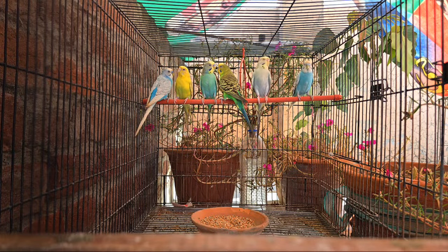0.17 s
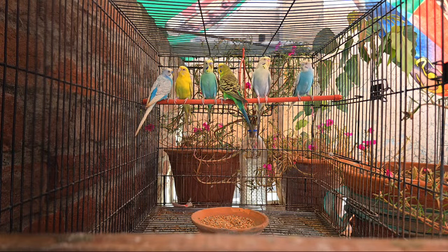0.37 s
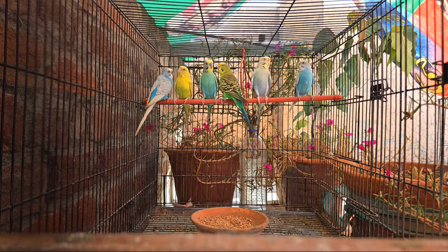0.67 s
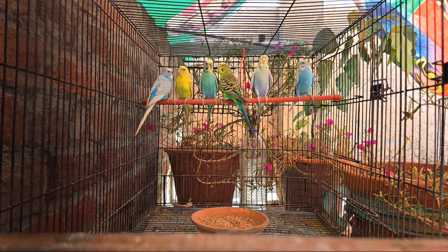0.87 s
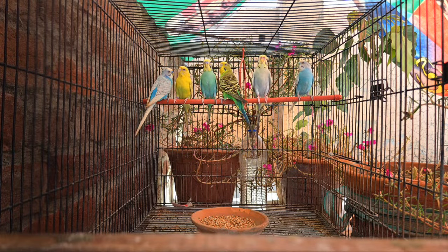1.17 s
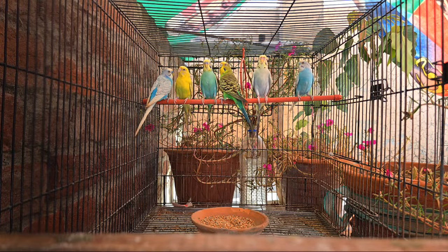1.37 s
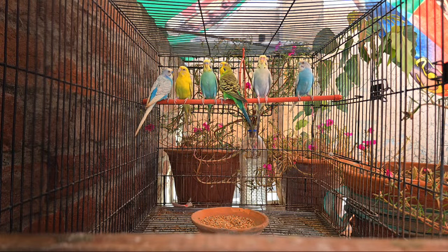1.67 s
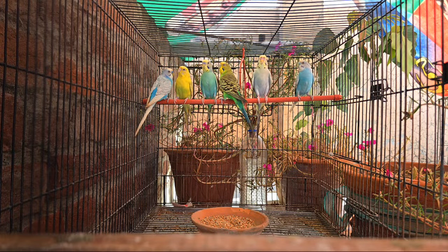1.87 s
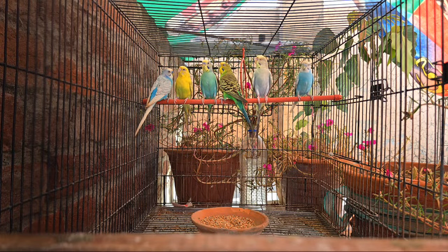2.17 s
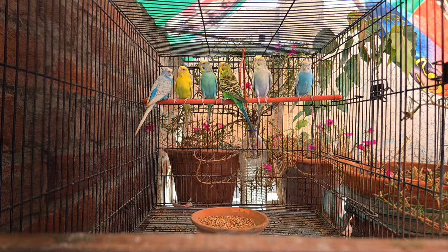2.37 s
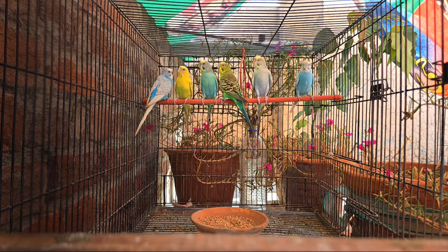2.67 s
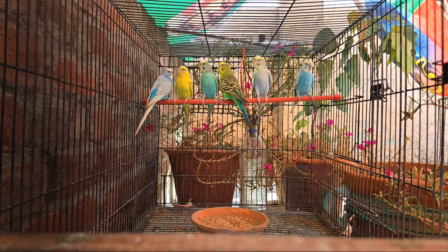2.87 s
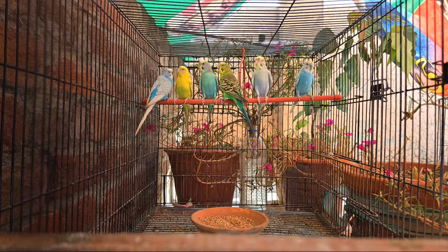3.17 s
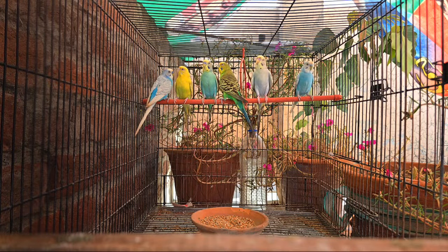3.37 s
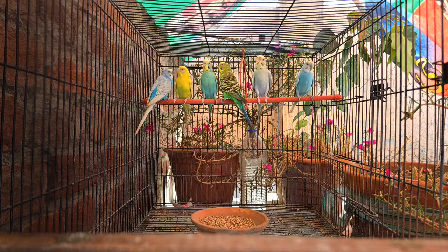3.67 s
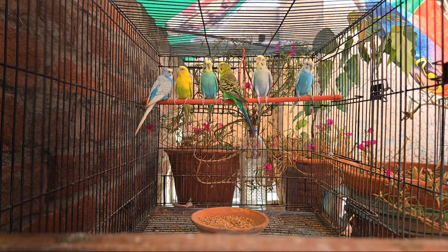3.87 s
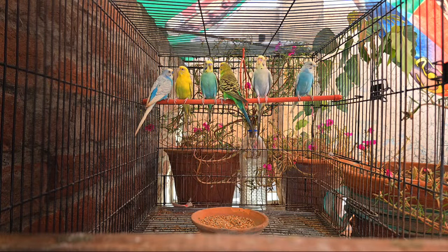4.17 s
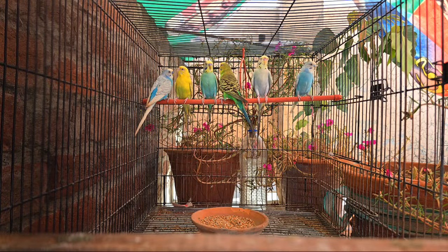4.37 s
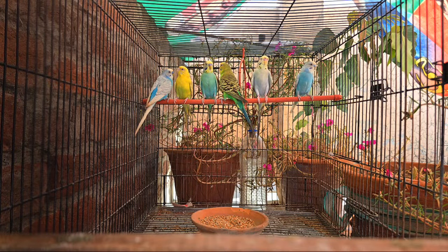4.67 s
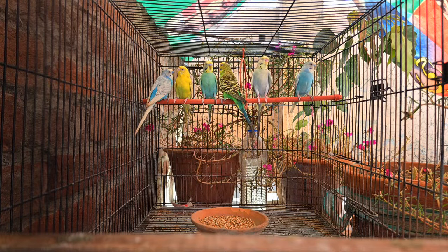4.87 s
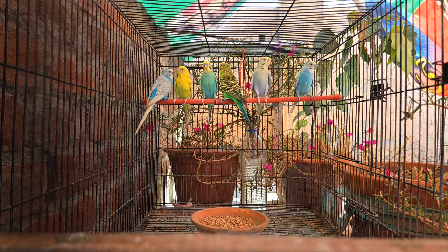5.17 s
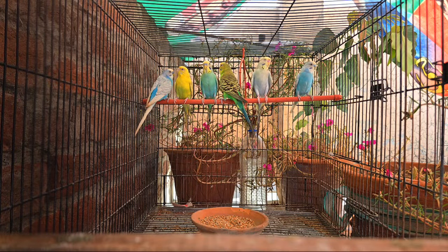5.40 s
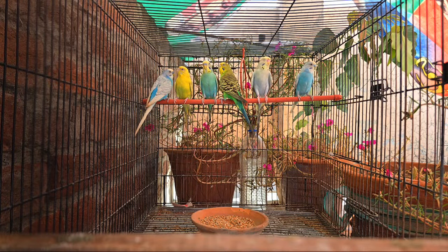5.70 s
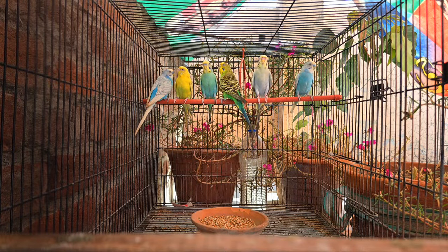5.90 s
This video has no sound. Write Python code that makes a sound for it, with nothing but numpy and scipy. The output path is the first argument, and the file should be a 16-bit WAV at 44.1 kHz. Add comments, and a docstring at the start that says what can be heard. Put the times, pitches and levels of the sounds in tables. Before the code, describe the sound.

Budgerigars in a cage give three pairs of sharp, raspy high chirps over a low traffic hum, with faint distant bird calls between.

```python
"""Budgerigars on a perch in a cage call three times in pairs: a loud high chirp, then a softer one that dips and climbs.
Each chirp is a tone with overtones, breath-like noise and a high hiss: fast flutter makes it a rasp, whistles come clear.
A brick wall and the porch around it answer with echoes, and the nook around the cage resonates.
Other birds call faintly far away, as filtered noise and wavering partials, over traffic hum of shaped noise."""
import sys
import numpy as np
from scipy import signal
from scipy.fft import rfft, irfft, next_fast_len
from scipy.io import wavfile
from scipy.ndimage import uniform_filter1d, minimum_filter1d, map_coordinates

SR = 44100
rng = np.random.default_rng(int(sys.argv[2]) if len(sys.argv) > 2 else 0)


def materialize(psi):
    """Save the field psi as 16-bit PCM at rate SR to the path in sys.argv[1].

    A 1-D psi becomes a single channel; in a 2-D psi each row is a channel.
    """
    bounded = np.clip(np.atleast_2d(psi).T, -1, 1)
    quanta = np.round(bounded * 32767).astype(np.int16)
    wavfile.write(sys.argv[1], SR, quanta)


N = 266275

# a gliding chirp lets go at the first time, before its stretch; every chirp has died the second time after letting go
GLIDE_RELEASE_S, RELEASE_S = 0.11917, 0.057


def amp(db):
    """Level to gain: 20 dB is a factor of ten in amplitude."""
    return 10 ** (np.asarray(db) / 20)


def unit(x):
    """Normalise the effective value: scale to rms 1."""
    return x / np.sqrt(np.mean(x ** 2) + 1e-20)


def along(points, hz):
    """Interpolate (frequency, value) points on a logarithmic frequency axis."""
    f, v = np.transpose(points)
    return np.interp(np.log(hz + 1), np.log(f + 1), v)


def level_curve(points, t):
    """Interpolate (time, level) points linearly at the times t."""
    s, db = np.transpose(points)
    return np.interp(t, s, db)


def wobble(rate, t):
    """Slow random modulation: interpolated normal noise with rate knots a second."""
    knots = rng.standard_normal(int(t[-1] * rate) + 4)
    return map_coordinates(knots, [t * rate])


def filtered(x, response):
    """Linear filtering: multiply the spectrum by a response of frequency."""
    m = next_fast_len(len(x) + 8192)
    return irfft(rfft(x, m) * response(np.fft.rfftfreq(m, 1 / SR)), m)[:len(x)]


def noise(spectrum, size):
    """Coloured noise: white noise shaped by (frequency, relative level) points, at rms 1."""
    return unit(filtered(rng.standard_normal(size), lambda hz: amp(along(spectrum, hz))))


def running_phase(hz):
    """Phase is the time integral of frequency, in radians."""
    return 2 * np.pi * np.cumsum(hz) / SR


def step(t, width):
    """Smooth transition: a hyperbolic tangent from 0 to 1 about t = 0."""
    return .5 + .5 * np.tanh(t / width)


def bump(t, width):
    """Gaussian pulse of height 1 at t = 0."""
    return np.exp(-(t / width) ** 2)


def background(hum_db=-1, rumble_db=-0.04, road_db=1.0, air_db=-84.5):
    """Sum of independent band noises: distant engines hum and rumble under road noise and a faint even hiss."""
    # colours, levelled to rms 1 as noise: frequency_hz, relative_db
    hum_colour = [(60, -49), (105, -25.5), (119, -4.5), (127, 4), (136, -0.5), (150, -8), (175, -33),
                  (300, -71.5), (600, -100)]
    rumble_colour = [(20, -43.5), (40, -22.5), (60, -8), (76, 7), (92, 2), (110, -12), (200, -56),
                     (600, -100)]
    road_colour = [(100, -24.5), (175, 4.5), (235, -2.5), (275, -3), (298, 5.5), (325, -6), (480, -9.5),
                   (700, -20), (1300, -28.5), (3000, -39.5), (7000, -59.5)]
    air_colour = [(200, 6.5), (1500, 6), (4000, 2.5), (7000, 0), (9500, -4), (11000, 3), (16000, -2.5)]
    # levels of engine hum, low engine rumble and road noise, before the trims above: time_s, level_db
    hum_level = [(0.05, -36.5), (0.45, -40), (0.7, -49), (0.9, -41.5), (1.25, -41), (1.55, -50),
                 (2.05, -40), (2.45, -45), (2.8, -41.0), (3.25, -50), (3.9, -57.5), (4.5, -49.5),
                 (5.05, -43.5), (5.5, -45), (5.7, -55.5), (5.95, -57)]
    rumble_level = [(0.15, -45.5), (0.5, -59.5), (0.85, -55.5), (1.1, -63), (2.0, -60), (2.5, -50.5),
                    (2.7, -44.5), (2.95, -47), (3.7, -56), (5.2, -56.5), (5.9, -63)]
    road_level = [(0.031, -55.5), (0.27, -55), (0.42, -61), (1.5, -59.5), (2.9, -57.5), (3.25, -64),
                  (4.301, -66.5), (5.1, -61.5), (5.65, -65)]
    waver_db, waver_knots_per_s = 1.3845, 7
    t = np.arange(N) / SR
    # an engine holds its level while its pitch wanders, so divide out most of the envelope
    analytic = signal.hilbert(noise(hum_colour, size=N))
    drone = unit(analytic.real / (np.abs(analytic) + 1.8))
    drone = unit(drone * amp(waver_db * wobble(waver_knots_per_s, t)))
    hum = amp(level_curve(hum_level, t) + hum_db) * drone
    rumble = amp(level_curve(rumble_level, t) + rumble_db) * noise(rumble_colour, size=N)
    road = amp(level_curve(road_level, t) + road_db) * noise(road_colour, size=N)
    return hum + rumble + road + amp(air_db) * noise(air_colour, size=N)


def far_birds():
    """Diffuse sound: distant calls arrive as echo only, narrow noise that swells around a pitch."""
    # far calls; two widths off the pitch the gain is a quarter, and
    # the level is that of the noise before its swell: middle_s, length_s, pitch_hz, width_hz, level_db
    calls = [(0.044, 0.1, 2535, 54.6, -62.5), (0.153, 0.12, 5070, 301.5, -82),
             (0.74, 0.16, 1914, 203.8, -73), (1.513, 0.098, 3446, 247.5, -83),
             (2.001, 0.265, 2582, 810, -66), (2.443, 0.15, 970, 281, -67),
             (2.645, 0.13, 3720, 220.3, -79.5), (3.011, 0.13, 1699, 132.8, -66.5),
             (3.616, 0.13, 1661, 138.6, -76.5), (3.758, 0.14, 380, 44.47, -64.5),
             (4.268, 0.1683, 3534, 335.2, -71), (4.254, 0.28, 1629, 400, -77.5),
             (4.901, 0.18, 3510, 301.9, -72), (4.851, 0.397, 1287, 605, -77),
             (5.32, .12, 4440, 202.3, -82.5), (5.398, 0.14, 1946, 150, -69.5)]
    t = np.arange(SR) / SR - .5
    out = np.zeros(N + 2 * SR)
    for middle, length, pitch_hz, width_hz, db in calls:
        band = lambda hz: 1 / (1 + ((hz - pitch_hz) / width_hz / 2) ** 2) ** 2
        blur = unit(filtered(rng.standard_normal(SR), band))
        out[round(middle * SR):][:SR] += amp(db) * blur * np.exp(-2 * (t / length) ** 2)
    return out[SR // 2:][:N]


def far_squawk(middle_s=1.996, length_s=0.2184, trim_db=5, waver_hz=22):
    """Additive synthesis: a larger bird far away, as a few wavering partials that swell and fade."""
    # partials, level before the trim and the waver: frequency_hz, level_db
    partials = [(1723, -88.5), (1825, -80), (2449, -99), (2568, -75.5), (3009, -76), (3440, -81),
                (3865, -81.5), (5211, -92)]
    t = np.arange(N) / SR
    squawk = 0
    for hz, db in partials:
        level = amp(db + 4 * wobble(29.97, t))
        squawk = squawk + level * np.sin(running_phase(hz + waver_hz * wobble(47, t)))
    return amp(trim_db) * squawk * np.exp(-2 * ((t - middle_s) / length_s) ** 2)


def porch(x, tail_db=-22.0, scatter_db=-14, scatter_t60_s=.13):
    """Reverberation by convolution: early wall echoes, quick scatter around the cage and a weak longer tail."""
    # first echoes of the walls: delay_s, level_db
    walls = [(.00134, -15), (.0022, -19), (.0065, -14.5), (0.0107, -11.5), (.0229, -14.5)]
    # decay of the tail by 60 dB: frequency_hz, t60_s
    decay = [(300, .45), (2200, 0.2), (3000, 0.32), (3700, 0.12), (6000, 0.35), (10000, .28),
             (15000, 0.065)]
    # colour of the tail as it begins: frequency_hz, relative_db
    colour = [(1500, -3.5), (2400, -7), (3050, 6), (3650, 8), (5000, -1.5), (15000, -3)]
    hz, t, z = signal.stft(rng.standard_normal(SR * 3 // 4), SR, nperseg=256)
    fading = amp(along(colour, hz)[:, None] - 60 * t / along(decay, hz)[:, None])
    tail = signal.istft(z * fading, SR, nperseg=256)[1]
    t = np.arange(len(tail)) / SR
    scatter = rng.standard_normal(len(t)) * amp(-60 * t / scatter_t60_s) * (t > .003)
    answer = amp(tail_db) * tail / np.linalg.norm(tail)
    answer = answer + amp(scatter_db) * scatter / np.linalg.norm(scatter)
    for delay, db in walls:
        answer[round(delay * SR)] += amp(db)
    return signal.fftconvolve(x, answer)[:N]


def nook(x, direct_db=-3):
    """Cavity resonance: the space between wall, floor and roof rings briefly at a few pitches."""
    # modes of the nook: centre_hz, width_hz, level_db
    modes = [(2015, 17, -10.5), (2175, 15, -6.5), (2731, 41, -5.5), (2953, 40, -3), (3198, 19, -4.5),
             (3591.3, 28, -7.5), (4500, 65, -7.5)]

    def response(f):
        """Direct sound plus second-order band-pass resonances."""
        ring = sum(amp(db) * 1j * f * w / (c * c - f * f + 1j * f * w) for c, w, db in modes)
        return amp(direct_db) + ring

    return filtered(x, response)


def effort(t, release):
    """Envelope in dB: exponential approach from below, hold, then a steep linear fall."""
    attack_db, attack_s, release_db_per_s = 31, 0.0047, 951
    return -attack_db * np.exp(-t / attack_s) - release_db_per_s * np.maximum(t - release, 0)


def leaping(t, low_hz, high_hz, jump, drop, again, release, rasp_db, rasp_rough):
    """Register switching: pitch, effort and roughness jump between a rough low and a clear high register."""
    switch_s, sag_hz_per_s = 0.002, 2100  # the whistle sinks from the first jump on
    rasp = 1 - step(t - jump, switch_s)
    dropped = step(t - drop, switch_s) * (1 - step(t - again, switch_s))
    whistle = 1 - rasp - dropped
    # the rasp briefly settles into a tone, then sags and weakens just before the jump
    settle = bump(t - jump + .022, .007)
    strain = bump(t - jump + .009, .005)
    # the long whistle falters part way through
    falter = bump(t - jump - 0.6 * (drop - jump), 0.009)
    # the first and the last jump land with an accent, the last after a slackening
    first_kick, last_kick = (bump(t - s - 0.0024, 0.0061) for s in (jump, again))
    pause = bump(t - again + .006, 0.0071)
    # the pitch flicks up as the voice starts
    flick = bump(t - .013, 0.0094)
    hz = (low_hz + whistle * (high_hz - low_hz - sag_hz_per_s * (t - jump))
          + 480 * flick - 330 * strain)
    effort_db = (effort(t, release) + rasp * rasp_db - 1 * dropped + 6.5 * settle
                 - 0.5 * strain - 9 * falter - 5 * pause + 3.5 * first_kick + 8.5 * last_kick)
    rough = (rasp * rasp_rough * (1 - .6 * settle) + strain + 0.37 * dropped
             + 0.045 * whistle + .3 * falter)
    return hz, effort_db, rough


def gliding(t):
    """Frequency glide: pitch, effort and roughness of a chirp that falls as a rasp and clears as it climbs."""
    # pitch before the chirp's own pitch factor; t is the time before its stretch
    top_hz, dip_hz, climb_hz_per_s, climb_s = 3726.5, 2413.3, 9500, 0.046
    throb_hz, throb_peak_s, throb_swing_hz, throb_db = 54.5, .1, 110, 6.5
    glide_db, clear_db, glide_rough, clear_rough = -8, 11, 0.6024, .05
    fallen = step(t - .022, .011)
    # louder and a little clearer in the dip, slack at the turn, then a loud whistle
    dip = bump(t - .036, 0.0054)
    turn = bump(t - .056, 0.0046)
    clear = bump(t - 0.08914, .02)
    soft_start = bump(t, 0.01191)
    # the voice throbs in pitch once it has fallen, and in level as it clears
    throb = np.cos(2 * np.pi * throb_hz * (t - throb_peak_s))
    hz = (top_hz + fallen * (dip_hz - top_hz + throb_swing_hz * throb)
          + climb_hz_per_s * (np.clip(t, climb_s, GLIDE_RELEASE_S) - climb_s))
    effort_db = (effort(t, GLIDE_RELEASE_S) + glide_db + 6.5 * dip
                 + clear * (clear_db + throb_db * throb) - 7.5 * turn - 5.5 * soft_start)
    rough = glide_rough + (clear_rough - glide_rough) * clear - 0.13 * dip
    return hz, effort_db, rough


def side_tones(t, waver=.035, fits_db=9):
    """Frequency and amplitude modulation: unsteady tones come and go in fits beside the main pitch."""
    # tones of a harshly buzzing voice, before buzz, roughness and effort weight them: frequency_hz, level_db
    tones = [(1950, -8.5), (4500, -12.5)]
    out = 0
    for hz, db in tones:
        level = amp(db + fits_db * np.tanh(wobble(110, t)))
        out = out + level * np.sin(running_phase(hz * (1 + waver * wobble(400, t))))
    return out


def chirp(t, hz, effort_db, rough, length, overtone_db, buzz, breath_db, high_hiss_db,
          flutter_hz=330, swing_hz=460, buzz_hz=1300, shake_db=5, third_db=-4, fourth_db=-11,
          rasp_db=6, split_db=-13, breath_rough_db=7, breath_follow=0.11, high_hiss_follow=0.59, grain_db=2.5):
    """Syringeal source and filter: flutter and a buzzing second membrane tear a tone into a rasp."""
    # response of the throat: frequency_hz, gain_db
    throat = [(500, -29.5), (1100, -20), (1600, -17.5), (1950, -6.5), (2500, -5.5), (3600, -1.5), (4050, 1),
              (4500, 5.5), (5100, 2.5), (5950, 12.5), (6700, -2.5), (7450, 3), (9000, 7.5), (11000, -0.5)]
    # breath-like noise, levelled to rms 1: frequency_hz, relative_db
    breath_colour = [(1500, -17.5), (4000, -19.5), (6000, -0.5), (7000, -15.5), (8400, 6.5), (9200, -2),
                     (10500, -14), (12000, -10), (16000, -19)]
    # separate band of high hiss above about 12 kHz, levelled to rms 1: frequency_hz, relative_db
    high_hiss_colour = [(9500, -34), (12200, 0.5), (14000, -2.5), (16000, -2)]
    buzz_onset_s, buzz_end_s, buzz_rise_s, noise_attack_s = .033, .118, 0.0043, 0.0048
    rough = np.clip(rough, 0, 1)
    fade = np.clip((length - t) / 0.15, 0, 1)
    # the membrane tension flutters at an uneven rate and swings the pitch
    flutter = np.sin(running_phase(flutter_hz * (1 + .35 * wobble(250, t)))) + .4 * wobble(900, t)
    phase = running_phase(hz + rough * swing_hz * flutter + 50 * wobble(200, t))
    # the second membrane sounds through the middle and puts sidebands on both sides of the tone
    buzz = buzz * step(t - buzz_onset_s, buzz_rise_s) * step(buzz_end_s - t, buzz_rise_s)
    buzzing = np.sin(running_phase(buzz_hz * (1 + 0.06 * wobble(300, t))))
    sidebands = 1 + 1.1 * buzz * rough * buzzing
    size = sidebands * amp(shake_db * rough * np.tanh(3.1 * wobble(600, t)))
    # harder collisions in the rasp give stronger overtones
    overtones = np.sin(2 * phase) + amp(third_db) * np.sin(3 * phase) + amp(fourth_db) * np.sin(4 * phase)
    overtones = overtones * amp(overtone_db + rasp_db * (rough - 2) + grain_db * wobble(500, t))
    # in a buzzing voice the cycles alternate, which adds a line an octave down
    split = amp(split_db) * buzz * np.sin(phase / 2)
    tone = np.sqrt(2) * amp(effort_db) * (np.sin(phase) + split + overtones)
    tone = filtered(tone * size * np.sqrt(fade), lambda f: amp(along(throat, f)))
    tone = tone + buzz ** 2 * np.sqrt(rough * fade) * amp(effort_db) * side_tones(t)
    # both noises follow the call, set in after a moment and flicker in level
    breath_level_db = breath_db + breath_follow * effort_db + breath_rough_db * (rough - 2.5)
    breath = amp(breath_level_db) * noise(breath_colour, size=len(t))
    high_hiss = amp(high_hiss_db + high_hiss_follow * effort_db) * noise(high_hiss_colour, size=len(t))
    flicker = fade * (1 - np.exp(-t / noise_attack_s)) * amp(grain_db * wobble(500, t))
    return np.clip(t / 0.0053, 0, 1) * (tone + flicker * (size * breath + high_hiss))


def budgies():
    """Superposition of calls: leaping chirps first in each pair, gliding chirps second."""
    # In both tables overtones, breath and high hiss are base levels that roughness or effort then shifts.
    # First chirps: a low rasp jumps to a whistle, drops back and jumps again; times from jump_s on count
    # from the start: start_s, level_db, low_hz, high_hz, jump_s, drop_s, second_jump_s, release_s,
    # rasp_db, rasp_roughness (0-1), overtones_db, buzz_share (0-1), breath_db, high_hiss_db
    leaping_calls = [(.246, -8, 3255, 3738, 0.0561, 0.0973, 0.128, 0.13745, -7.5, 0.76, -18, .13, -18.5, -19.5),
                     (3.077, -9, 3193, 3767, 0.05693, .092, 0.1265, 0.1297, -7, 0.77, -15.5, 0.16, -14, -25),
                     (5.450, -8, 3035, 3697, .084, .112, .138, 0.1342, -9, 0.632, -17.5, 0.702, -15, -22.5)]
    # second chirps, one glide down and up: start_s, level_db, pitch_factor, length_factor,
    # overtones_db, buzz_share (0-1), breath_db, high_hiss_db
    gliding_calls = [(.830, -12.5, 0.9356, 1.05, -27.5, 0.163, -21, -25),
                     (3.309, -13, 0.933, 1.01, -29, 0.124, -15, -22),
                     (5.725, -11.5, 0.9364, .99, -28.5, 0.17, -21, -25)]
    t = np.arange(SR // 5) / SR
    out = np.zeros(N + SR)
    for s, db, low_hz, high_hz, jump, drop, again, release, rasp_db, rasp_rough, *colour in leaping_calls:
        hz, effort_db, rough = leaping(t, low_hz, high_hz, jump, drop, again, release, rasp_db, rasp_rough)
        call = chirp(t, hz, effort_db, rough, release + RELEASE_S, *colour)
        out[round(s * SR):][:len(t)] += amp(db) * call
    # the high hiss grows late in a glide
    swell_db = 9 * bump(t - 0.15, 0.025)
    for s, db, pitch, stretch, overtone_db, buzz, breath_db, high_hiss_db in gliding_calls:
        hz, effort_db, rough = gliding(t / stretch)
        length = GLIDE_RELEASE_S * stretch + RELEASE_S
        high_hiss_db = high_hiss_db + swell_db
        call = chirp(t, hz * pitch, effort_db, rough, length, overtone_db, buzz, breath_db, high_hiss_db)
        out[round(s * SR):][:len(t)] += amp(db) * call
    return out[:N]


def scene(birds_db=1.66):
    """Superposition: near birds with their echoes, far birds and traffic."""
    birds = nook(budgies())
    near = amp(birds_db) * (birds + porch(birds))
    return (near + far_birds() + far_squawk() + background())[None]


def record(dry, ceiling=.85, top_hz=15950):
    """Peak limiting, gating and low-pass: loud peaks are held, the level dips twice, the top is cut off."""
    # the sound cuts out for an instant, once fully and once in part: start_s, length_s, depth (0-1)
    gaps = [(5.791, .0035, 1), (5.8142, .0006, .7)]
    x, t = dry[0], np.arange(N) / SR
    needed = np.minimum(1, ceiling / (np.abs(x) + 1e-9))
    gain = uniform_filter1d(minimum_filter1d(needed, size=265), size=133)
    passing = np.ones(N)
    for s, length, depth in gaps:
        passing = passing * (1 - depth * ((t > s) & (t < s + length)))
    edge = lambda hz: np.clip((top_hz - hz) / 200, 0, 1)
    return filtered(x * gain * passing, edge)[None]


dry = scene()
out = record(dry)
materialize(out)
```